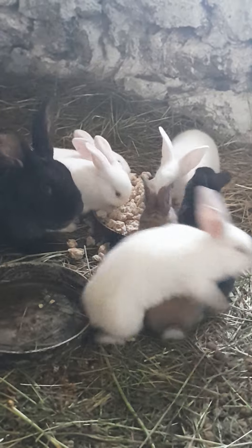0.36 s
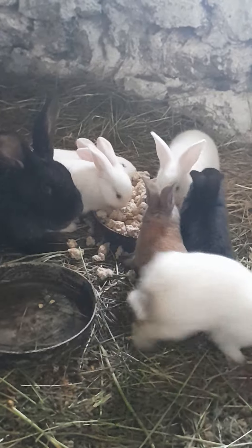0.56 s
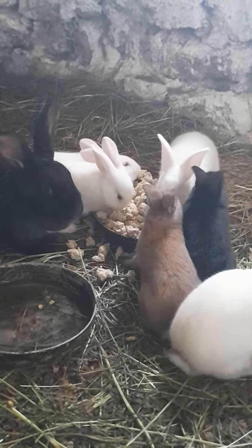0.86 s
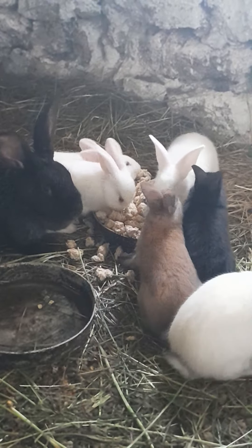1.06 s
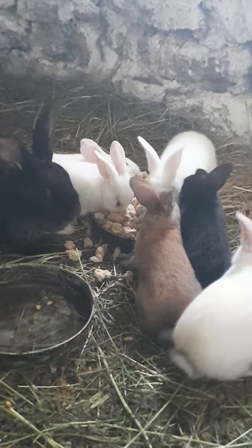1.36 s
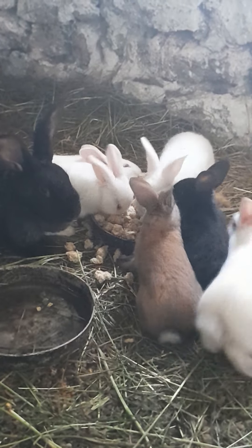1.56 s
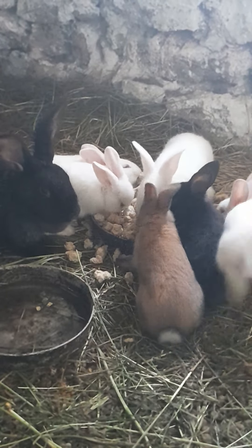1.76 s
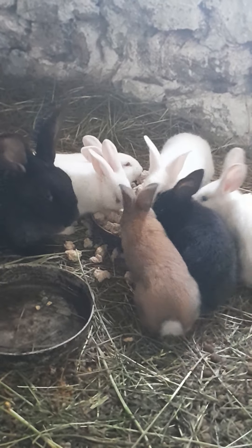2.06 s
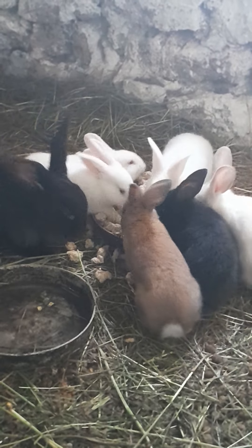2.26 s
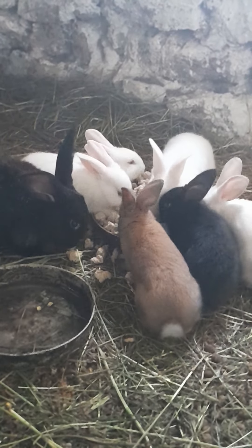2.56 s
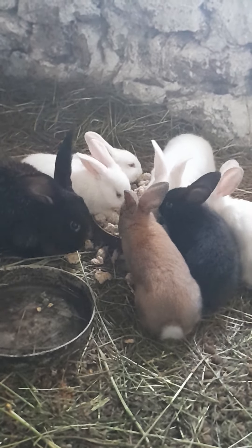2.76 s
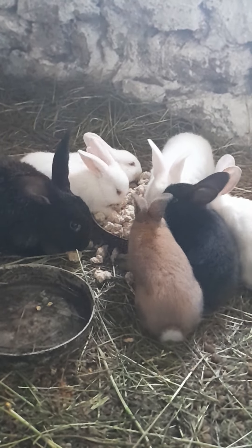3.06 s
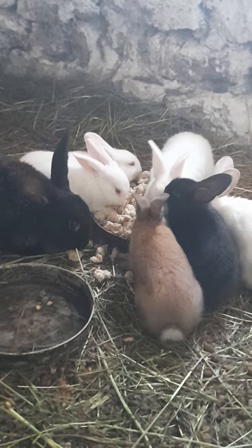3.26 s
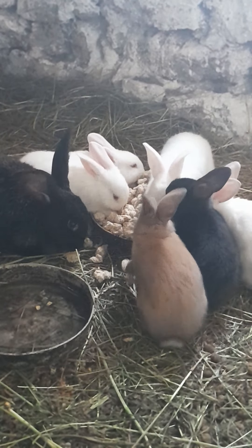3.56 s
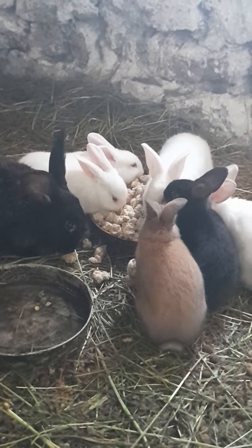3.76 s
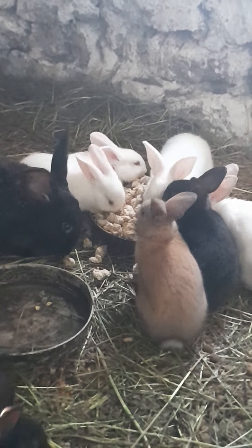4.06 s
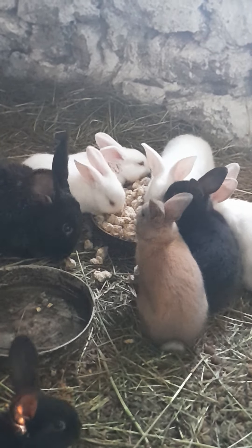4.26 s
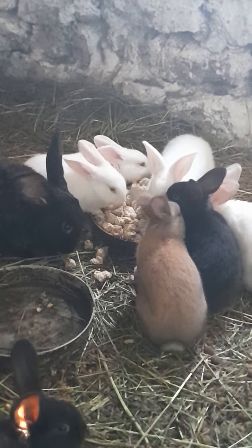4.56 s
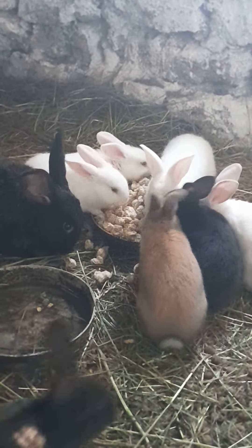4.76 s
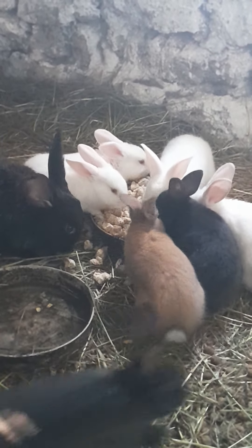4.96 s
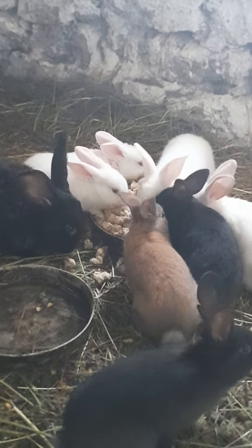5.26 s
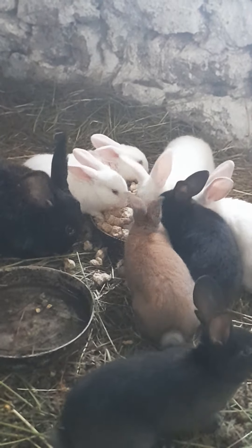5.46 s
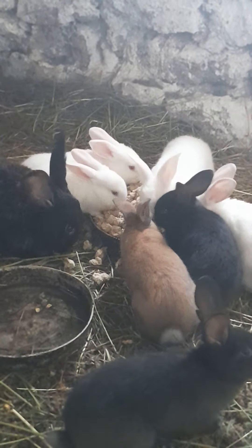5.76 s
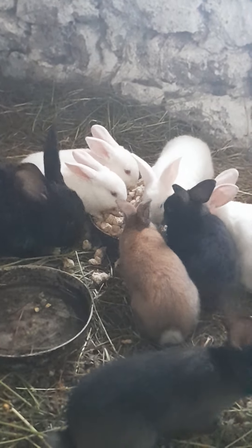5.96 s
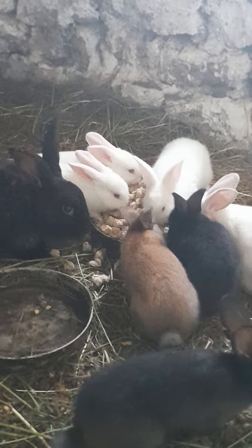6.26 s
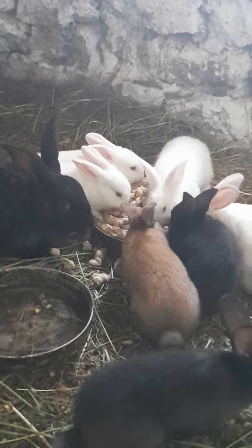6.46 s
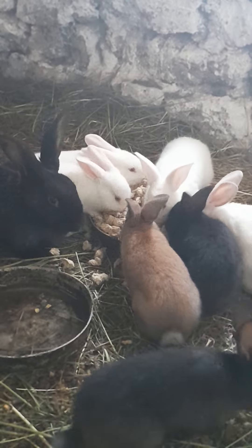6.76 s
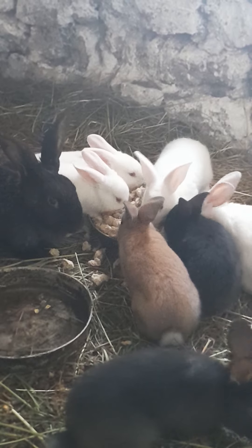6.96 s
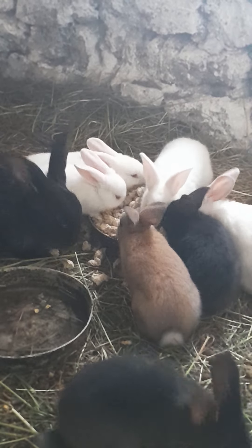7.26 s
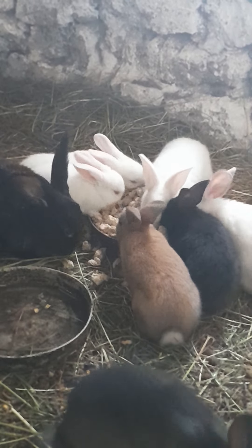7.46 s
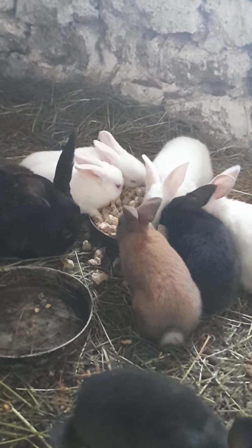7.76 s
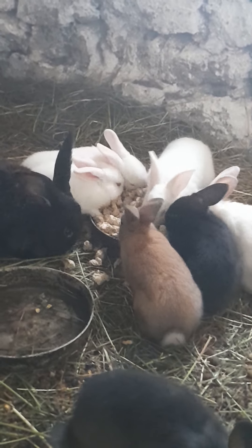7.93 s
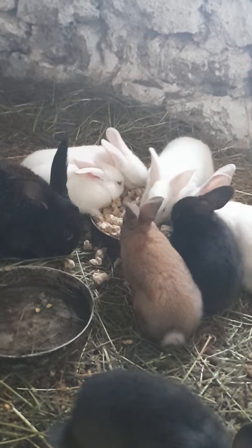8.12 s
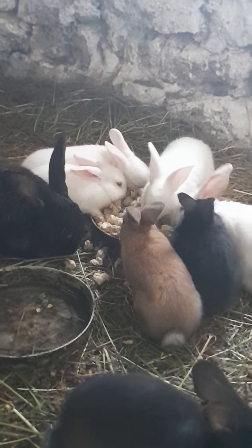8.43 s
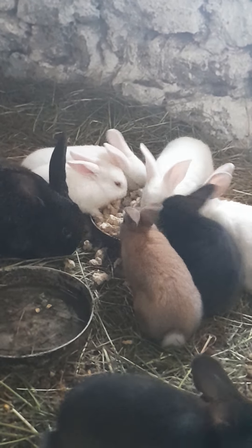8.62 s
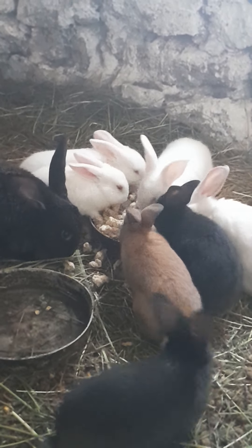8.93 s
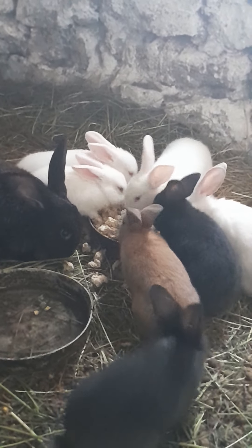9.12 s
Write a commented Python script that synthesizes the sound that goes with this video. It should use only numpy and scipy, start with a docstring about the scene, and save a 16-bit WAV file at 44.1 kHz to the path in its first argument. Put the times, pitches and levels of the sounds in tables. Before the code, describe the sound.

Close stereo microphones in a small stone-walled pen: rabbits snap and crumble dry feed and stir straw over a low, throbbing engine outside. A rooster beyond the doorway crows once, starting with rough, broken squawks and then holding a long clean note that falls. A hard clatter at the feed follows, then far-off roosters answer, small birds twitter, something flutters harshly, and nibbling continues.

```python
"""An engine rumbles behind stone walls while young rabbits crunch dry feed and shuffle on straw in a pen.
A rooster outside crows once, rough at first, then on a long clean note; far-off fowl answer, birds twitter,
and about 6.5 s something flutters harshly. The engine, a sum of orders of one cycle, slowly gathers speed.
The voices are sines with moving pitch; feed, straw, litter and soft low swells are noise or trains of
random cracks, filtered to their colours. Random tails give the pen and the doorway their reverberation."""
import sys
import numpy as np
from scipy import signal
from scipy.fft import rfft, irfft, next_fast_len
from scipy.io import wavfile

SR = 44100
rng = np.random.default_rng(int(sys.argv[2]) if len(sys.argv) > 2 else 0)


def wav_out(sig):
    """Save sig, one row per channel (or a flat mono array), as 16-bit PCM at SR to the path in sys.argv[1]."""
    wavfile.write(sys.argv[1], SR, np.round(np.clip(np.atleast_2d(sig).T, -1, 1) * 32767).astype(np.int16))


N = 409688
TIME = np.arange(N) / SR

# Spectrum of still air. Each row: frequency in Hz, relative density in dB per Hz.
AIR_COLOUR = [(130, -31), (220, -1), (326, -5), (427, -14), (681, -19), (4560, -27), (6410, -26),
              (7530, -29), (10400, -31), (15200, -26), (16000, -32)]
AIR_DB = -70
# Left-right likeness of diffuse sound. Each row: frequency in Hz, correlation from 0 to 1.
LIKENESS = [(25, 0.086), (45, 1), (80, 1), (150, 0.42), (300, 0.39), (700, 0.38), (2000, 0.026),
            (14000, 0.017)]
# Treble difference of the two microphones. Each row: frequency in Hz, left-right level in dB.
MIC_BALANCE = [(200, 1.5), (600, -0.5), (2000, 1), (5500, -2.5), (7000, -0.5), (8800, 10.5), (10500, 1),
               (12500, 0), (16000, -2.5)]
PEN_T60_S, CUTOFF_HZ = 0.19, 16200

# Engine speed. Each row: time in seconds, working cycles per second.
ENGINE_SPEED = [(0, 11.05), (.3, 11.28), (1.5, 11.3), (2, 11.72), (3.1, 11.76), (4.2, 12.6), (4.8, 12.2),
                (5.2, 12.95), (5.85, 13.3), (6.7, 13.3), (7.1, 13.52), (9.29, 14.12)]
# Firing tone, the eighth order. Each row: time in seconds, level in dB before the dips.
FIRING = [(0, -46), (1.4, -45.5), (1.9, -48), (2.3, -46.5), (2.8, -51), (3.3, -48.5), (4.3, -51.5),
          (5.15, -50), (6.05, -55), (6.4, -51), (7.9, -50.5), (9.29, -56)]
# Passage of orders 5, 7 and 10 through the walls. Each row: frequency in Hz, level in dB before waver and dips.
WALLS = [(55, -79), (59, -69), (61, -58.5), (66, -57), (70, -49), (79, -53.5), (82, -59), (90, -76),
         (100, -70), (112, -56), (118, -72), (130, -69), (134, -64.5), (140, -54.5)]
# Yard resonances that shape the weaker orders. Each row: frequency in Hz, level in dB before waver and dips.
YARD = [(33, -85), (45, -74.5), (68, -64.5), (80, -58.5), (100, -65.5), (124, -77), (143, -70.5),
        (165, -81.5), (181, -73.5), (195, -81.5), (218, -80.5), (245, -99.5), (300, -88), (350, -93)]
# Spectrum of the noisy part of the rumble. Each row: frequency in Hz, relative density in dB per Hz.
RUMBLE_COLOUR = [(22, -15.5), (40, -5), (65, -9), (95, 2.5), (130, -2.5), (200, -18), (320, -19.5),
                 (450, -34.5), (700, -42)]
# Brief changes of level. Each row: time in seconds, loss of the upper orders in dB, loss of the fifth in dB.
DIPS = [(.6, 5, -3), (1.77, 7, -2), (3.02, 8.5, -5), (4.33, 3.5, 8), (5.31, 9, 1), (5.67, 17.5, 13),
        (5.97, 3, 8), (7.07, 3, 4), (7.66, 1, 18), (8.25, 0, 29), (9.02, 9, 21)]
DIP_WIDTH_S = 0.067
FIRST_THROB_S = .06   # the strong orders come into step here, and once a cycle after
# Soft swells of low noise, some as the engine speeds up. Each row: start in seconds, length in seconds,
# level in dB.
LOW_SWELLS = [(3.33, 0.18, -66), (3.607, 0.091, -70), (4.383, .08, -62), (4.97, 0.24, -75),
              (7.232, .08, -72), (8.352, 0.23, -66), (8.665, 0.235, -69.5), (9.085, 0.18, -67)]
# Spectrum of the low swells. Each row: frequency in Hz, relative density in dB per Hz.
LOW_SWELL_COLOUR = [(170, -9), (250, 0), (340, 0), (450, -10)]

# Small birds, and about 6.5 s a harsh rustling flutter. Each row: start in seconds, length in seconds,
# start pitch in Hz, end pitch in Hz, relative level in dB, trill depth as a share of the pitch.
CHIRPS = [(5.094, 0.15, 3540, 3330, -89, 0.062), (5.485, 0.096, 2740, 2840, -94, 0.049),
          (5.746, 0.13, 4450, 4320, -89.5, 0.049), (5.726, 0.14, 6630, 6550, -88, 0.026),
          (5.787, 0.091, 3800, 3600, -86.5, 0.04), (5.927, 0.072, 4070, 3830, -88, 0.044),
          (6.155, 0.13, 3740, 3410, -84, 0.062), (6.35, 0.24, 3430, 3650, -82.5, 0.028),
          (6.494, 0.056, 3100, 2796, -78, 0.175), (6.516, 0.12, 4880, 4410, -78, 0.106),
          (6.569, 0.023, 4100, 3890, -74, 0.045), (6.775, 0.25, 4700, 4120, -86.5, 0.05),
          (6.786, 0.11, 6840, 6600, -87, 0.047), (6.994, 0.062, 4100, 3570, -82, 0.039),
          (7.154, 0.037, 4060, 3840, -85, 0.023), (7.421, 0.16, 4500, 4680, -86.5, 0.083),
          (8.354, .15, 4820, 4390, -77, 0.084), (8.678, 0.13, 2395, 2090, -87, 0.048),
          (8.702, 0.1, 4800, 4300, -84.5, 0.072), (8.68, 0.13, 6660, 6670, -87, 0.026),
          (8.98, 0.054, 2814, 2810, -83.5, 0.091), (9.203, 0.09, 2240, 2400, -86.5, 0.061)]
# A far rooster's wavering held note. Each row: time in seconds, pitch in Hz, level in dB before flicker.
FAR_HELD = [(4.1, 1010, -79), (4.19, 1032, -70), (4.29, 1048, -75), (4.39, 1004, -80.5),
            (4.51, 1029, -76.5), (4.6, 1041, -66.5), (4.71, 1013, -78), (4.8, 1038, -73.5),
            (4.87, 1087, -72), (4.94, 940, -83)]
# Another climbs in swells until its voice breaks up and down. Each row: time in seconds, pitch in Hz,
# level in dB before flicker.
FAR_BROKEN = [(5.48, 920, -96), (5.621, 1026, -83), (5.74, 1050, -84), (5.81, 1095, -67), (5.87, 1132, -82),
              (5.99, 1143, -72.5), (6.03, 1130, -84), (6.09, 1100, -68), (6.16, 1072, -62),
              (6.195, 1078, -79), (6.215, 1190, -74), (6.265, 1138, -61), (6.305, 1070, -66.5),
              (6.33, 1195, -69), (6.375, 1124, -66), (6.41, 1110, -94)]

# Opening notes of the crow. Each row: start in seconds, length in seconds, pitch in Hz,
# fundamental in dB, octave in relative dB, third harmonic in relative dB.
SHORT_NOTES = [(1.622, 0.11, 535, -61, -77, -72.5), (1.684, 0.1, 590.2, -58, -80, -80),
               (1.752, 0.097, 556, -60.5, -66, -78), (1.883, 0.11, 560, -62, -77, -71.5),
               (2.006, 0.25, 568, -71, -69.5, -67)]
NOTE_ATTACK_S, NOTE_RELEASE_S = 0.0202, 0.03
NOTE_SAG, SQUAWK_SAG = .03, 0.037   # a note's ends lie lower by this share of its pitch
# The long note, which holds and finally falls. Each row: time in seconds, pitch in Hz.
CROW_PITCH = [(2.24, 577), (2.4, 578), (2.49, 588), (2.61, 563), (2.8, 577), (3.03, 583), (3.33, 595),
              (3.53, 586), (3.77, 546), (3.86, 524), (4.02, 507), (4.16, 458)]
# Fundamental of the long note. Each row: time in seconds, level in dB.
FUNDAMENTAL = [(2.24, -57), (2.43, -55), (2.52, -56), (2.75, -55.5), (3.0, -58), (3.12, -44.5), (3.24, -41),
               (3.42, -44), (3.572, -51.5), (3.73, -49), (3.95, -52), (4.05, -52.5), (4.159, -92)]
# Octave of the long note. Each row: time in seconds, relative level in dB.
OCTAVE = [(2.24, -74), (2.33, -66.5), (2.42, -65.5), (2.49, -55), (2.57, -71.5), (2.72, -70), (2.84, -77),
          (3.0, -65.5), (3.47, -65), (3.6, -79), (3.7, -80), (3.77, -68.5), (3.98, -76), (4.05, -70),
          (4.16, -73)]
# Third harmonic of the long note. Each row: time in seconds, relative level in dB.
THIRD = [(2.24, -64), (2.33, -63.5), (2.52, -72.5), (2.59, -63), (2.66, -62.5), (2.71, -79), (2.77, -64.5),
         (2.88, -69), (3.03, -87), (3.13, -68), (3.42, -71.5), (3.52, -81), (3.66, -66.5), (3.79, -75),
         (3.9, -64), (4.03, -54), (4.16, -74)]
# Reflections move the fundamental between the ears. Each row: time in seconds,
# phase lead at the left in radians, left-right level in dB.
FUNDAMENTAL_STEREO = [(2.05, 2, 4), (2.28, 2.5, 4), (2.44, 2.5, 6), (2.52, 1, 7), (2.6, 3, 0.5),
                      (2.92, 4, 1), (3.12, 0.84, 7), (3.35, 1, 9), (3.48, 0.5, 1), (3.59, -2.5, 1.5),
                      (3.73, -2.5, -0.5), (3.83, -1.5, 5), (4.1, 1, 0)]
# Hoarseness of the crow. Each row: time in seconds, pitch flutter as a share of the pitch.
HOARSE = [(2.2, .014), (2.32, .007), (2.55, .004), (3.0, .0025), (3.1, .0008), (3.52, .0008), (3.65, .008),
          (3.85, .004)]
# Harmonics above the third. Each row: time in seconds, relative level in dB.
BRIGHTNESS = [(1.62, -92), (1.74, -79), (1.9, -83), (2.3, -95), (2.8, -92), (3.15, -84.5), (3.5, -78),
              (3.65, -84), (3.83, -81.5), (4.15, -100)]
# Steady throat resonances above the third harmonic. Each row: frequency in Hz, relative level in dB.
THROAT = [(1900, -6), (2150, -2), (2330, -13), (2600, -17), (2900, -5), (3300, -29), (3510, -10), (3580, 7),
          (3750, 6), (3950, -5), (4150, 1), (4600, -7.5), (5250, 4.5), (5800, -25), (6400, -1), (6900, -19),
          (8000, -35)]
# A lower resonance that shifts and swells. Each row: time in seconds, centre in Hz, relative level in dB.
RING = [(1.62, 2750, -85), (1.7, 2670, -85), (1.8, 2770, -78), (2.04, 2800, -68.5), (2.25, 2900, -78),
        (2.36, 2800, -69), (2.5, 2820, -78), (2.6, 2800, -69.5), (2.72, 2800, -69), (2.8, 2700, -82),
        (2.86, 2330, -71), (2.97, 2394, -102), (3.2, 2617, -77), (3.55, 2250, -87), (3.76, 2393, -83),
        (3.85, 2546, -77), (4.1, 2506, -92)]
# A treble resonance moved by the opening beak. Each row: time in seconds, centre in Hz, relative level in dB.
BEAK = [(1.62, 6100, -88), (2.1, 5900, -88), (2.37, 5950, -80), (2.479, 6150, -75.5), (2.6, 6700, -80),
        (2.8, 6500, -92), (3.15, 6506, -85), (3.481, 6500, -82), (3.7, 6460, -79), (4.1, 5475, -80)]
RING_WIDTH_HZ, BEAK_WIDTH_HZ = 350, 310
# The other side of the syrinx. Each row: start in seconds, length in seconds, pitch in Hz, fundamental
# in relative dB, octave in relative dB, flutter as a share of the pitch, rasp in relative dB.
SQUAWKS = [(1.615, 0.062, 727, -83, -69, 0.025, -77), (1.654, 0.1, 628, -55, -83, 0.027, -61),
           (1.912, 0.12, 744.7, -57, -53, 0.012, -56), (2.008, 0.17, 685, -58, -77, 0.038, -69),
           (2.096, .1, 737.4, -53, -57, 0.02, -54), (2.182, 0.099, 681.6, -53, -69.5, 0.024, -49.5)]
# Overtones of the squawks. Each row: multiple of the pitch, level in dB relative to the octave.
SQUAWK_OVERTONES = [(3, -46), (4, -20), (5, -37), (7, -28.5), (8, -26.5)]
# Resonances of the rasp. Each row: frequency in Hz, relative density in dB per Hz.
RASP_COLOUR = [(400, -26), (560, -7), (650, 15.5), (760, -8), (950, -11.5), (1250, -12), (1500, -0.5),
               (1750, -27), (2100, -13), (2500, -45), (2900, -24), (3500, -37)]

# Spectrum of the scuff. Each row: frequency in Hz, relative density in dB per Hz.
SCUFF_COLOUR = [(350, -19), (600, -7.5), (950, -1), (1500, -11), (2400, -19), (4000, -58)]
SCUFF_AT_S, SCUFF_LENGTH_S, SCUFF_DB = 1.156, 0.38, -64   # one rabbit hops
# Hard paws drag through the litter. Each row: start in seconds, length in seconds, level in dB.
SCRAPES = [(6.195, 0.091, -69), (6.45, 0.1, -59), (6.744, 0.082, -63), (8.879, 0.071, -63.5)]
# Gritty spectrum of the scrapes. Each row: frequency in Hz, relative density in dB per Hz.
SCRAPE_COLOUR = [(500, 4), (1500, -7), (2800, -0.5), (4500, -2.5), (6500, -1.5), (8500, -0.5), (11000, -9),
                 (16000, -8)]
SCRAPE_ATTACK_S, SCRAPE_RELEASE_S = 0.012, 0.061
# Paws and muzzles stir the straw. Each row: start in seconds, length in seconds, relative level in dB.
SHUFFLES = [(0.73, 0.24, -69), (1.038, 0.11, -69), (1.166, 0.28, -63.5), (1.53, 0.35, -67.5),
            (3.32, 0.22, -59), (3.662, 0.32, -61), (3.955, 0.32, -62.5), (4.403, 0.25, -78),
            (4.963, 0.16, -67), (5.086, 0.13, -55), (5.863, 0.57, -69.5), (7.417, 0.11, -60.5),
            (7.571, 0.17, -58.5), (8.337, 0.24, -62.5), (8.566, 0.17, -65), (8.848, 0.16, -62),
            (9.086, 0.11, -75)]
# Spectrum of the straw. Each row: frequency in Hz, relative density in dB per Hz.
STRAW_COLOUR = [(1200, -8), (2500, -7), (4500, -3.5), (7000, -1.5), (10000, -5), (13500, -0.5),
                (16000, -4.5)]
SHUFFLE_ATTACK_S, SHUFFLE_RELEASE_S = 0.044, 0.099
STRAW_REST_DB = -96   # relative, as in the shuffles
# Paws and knocks on the feed dish. Each row: time in seconds, relative level in dB, decay in seconds.
THUDS = [(0.584, -71.5, 0.012), (1.02, -73, 0.02), (3.233, -53.5, 0.04), (4.234, -63, 0.012),
         (4.272, -65, 0.0096), (4.632, -62, 0.024), (6.471, -79, 0.031), (7.236, -73.5, 0.02),
         (7.612, -74, 0.08), (7.66, -67, 0.032), (7.735, -64, 0.011), (8.394, -76, 0.34),
         (8.477, -47, 0.0057), (8.526, -69.5, 0.042), (8.972, -75.5, 0.051), (9.086, -63.5, 0.024),
         (9.112, -68, 0.016), (9.171, -63.5, 0.0088)]
# Dull spectrum of the knocks. Each row: frequency in Hz, relative density in dB per Hz.
THUD_COLOUR = [(150, 14.5), (300, -5.5), (620, 12.5), (1050, 1.5), (1500, -2), (2300, -9), (3200, -29),
               (5000, -16)]
# Bites and snaps. Each row: time in seconds, snap in relative dB, crumble in relative dB,
# power share of the treble in dB, before limiting.
BITES = [(.077, -57, -67, -20), (.2205, -56, -75, -5), (0.264, -62, -63.5, -10), (0.292, -58, -63, -1),
         (0.523, -57, -72, -10), (.5612, -55, -72, 2), (.586, -37, -60.5, -5), (.7623, -60, -69.5, -8),
         (.85, -56, -61.5, -3.5), (1.023, -40, -61.5, -3.5), (1.047, -42, -60.5, -10),
         (1.0744, -48, -65.5, -2), (1.314, -49, -52, -7), (1.35, -45, -55.5, -2), (1.635, -48, -63.5, 0),
         (1.6447, -41, -74, 1), (1.785, -53, -59, -3), (1.848, -56, -63.5, -5), (1.891, -48, -58, -16),
         (1.9257, -46, -59, -4), (2.7384, -57, -73, -4), (2.92, -58, -63.5, -9), (3.2272, -35, -56, -9),
         (3.2346, -23, -47, -22), (3.26, -40, -68, -16), (3.271, -18, -59, -9), (3.272, -17.5, -49, -20),
         (3.2766, -19, -61, -10), (3.301, -23, -57, -9), (3.3825, -45, -68, -8), (3.411, -42, -52, -13),
         (3.437, -41, -58, -20), (3.6008, -60, -65, -14), (3.7332, -58, -64.5, -9), (4.0005, -55, -60, -1),
         (4.049, -48, -62, -20), (4.236, -46, -65, -5), (4.2725, -43.5, -67, -4), (4.4456, -51, -73, 5),
         (4.468, -45, -75, 4), (4.4964, -45, -71, -7), (4.5227, -50, -70, -3), (4.5527, -57, -64, 1),
         (4.631, -40, -51.5, -12.5), (5.2013, -37.5, -60, -1.5), (5.382, -57, -70.5, -6),
         (5.633, -49, -69, -13), (5.98, -47, -65, -16), (6.091, -61, -77, -1), (7.208, -56, -66, -7),
         (7.2355, -40, -52.5, -3.5), (7.256, -42, -60.5, -22), (7.4316, -52, -71, -10),
         (7.471, -49, -63.5, -1), (7.626, -52, -53.5, -21), (7.667, -35, -54, -3), (7.687, -38, -63, -14),
         (7.7352, -33, -57, -3), (8.1773, -57, -62, -7), (8.2818, -43, -63.5, -14),
         (8.432, -41, -50.5, -15), (8.4756, -28, -58, -4), (8.601, -52, -69, -5), (8.627, -50, -66, -1),
         (8.6833, -49, -65, -5), (8.934, -44, -65.5, -2), (9.087, -54, -75, -3), (9.105, -40, -58.5, -2),
         (9.1452, -49, -60.5, -8), (9.171, -38, -62, -7)]
# Spectrum of the cracks. Each row: frequency in Hz, relative density in dB per Hz.
CRACK_COLOUR = [(880, -8.5), (1500, -3), (2610, -4.5), (2880, -8), (3590, -4.5), (3880, -1), (4590, -5),
                (5280, -2.5), (5710, -0.5), (8080, -1.5), (11900, -3), (13800, 3.5), (16000, -8.5)]
CRUMBLE_S, SNAP_S = 0.022, 0.00032   # e-folding times: crumble power over a quarter of this, snap amplitude


def from_db(db):
    """Logarithmic level: decibels to amplitude gain."""
    return 10 ** (np.asarray(db) / 20)


def rms_one(x):
    """Power normalisation: scale to unit mean square."""
    return x / np.sqrt(np.mean(x ** 2) + 1e-20)


def in_time(rows):
    """Linear interpolation: each column of a time table at every sample."""
    s, *columns = np.transpose(rows)
    return [np.interp(TIME, s, c) for c in columns]


def at_hz(points, hz):
    """Logarithmic pitch scale: read a spectrum on a log-frequency axis."""
    f, value = np.transpose(points)
    return np.interp(np.log(hz), np.log(f), value)


def during(rows):
    """Gating: a window over the span of a time table, with 20 ms ramps."""
    return np.clip(np.minimum(TIME - rows[0][0], rows[-1][0] - TIME) / .02, 0, 1)


def swell(s, length, attack_s, release_s):
    """Amplitude envelope: attack, hold and release of one sound."""
    return np.clip(np.minimum((TIME - s) / attack_s, (s + length - TIME) / release_s), 0, 1)


def arch(s, length, sag):
    """Parabolic glide: pitch factor that rises to the middle of a note and sinks again."""
    return 1 - sag * np.clip(2 * (TIME - s) / length - 1, -1, 1) ** 2


def drift(rate):
    """Random modulation: a wander of spread 1, joined linearly between 2 * rate random knots a second."""
    knots = rng.standard_normal(N // 8)
    return np.interp(TIME * rate * 2, np.arange(len(knots)), knots) * np.sqrt(3 / 2)


def phase_of(hz):
    """Frequency modulation: phase is the running integral of frequency."""
    return 2 * np.pi * np.cumsum(hz) / SR


def partial(phase, db):
    """Simple harmonic motion: a sine of the given rms level from a random starting phase."""
    return np.sqrt(2) * from_db(db) * np.sin(phase + rng.uniform(0, 2 * np.pi))


def resonance(hz, track, width_hz):
    """Resonance: gain of a partial near a centre that moves and swells."""
    centre, db = track
    return from_db(db) / (1 + ((hz - centre) / width_hz) ** 4)


def coloured(x, spectrum):
    """Minimum-phase filtering: a causal spectrum of unit mean power, built from its folded cepstrum."""
    size = next_fast_len(N + SR // 4) // 2 * 2
    half = size // 2
    hz = np.maximum(np.arange(half + 1) * SR / size, 1)
    octaves_below = np.maximum(np.log2(spectrum[0][0] / hz), 0)
    octaves_above = np.maximum(np.log2(hz / spectrum[-1][0]), 0)
    # beyond its ends the spectrum falls 24 dB an octave, for three octaves
    db = at_hz(spectrum, hz) - 24 * np.minimum(octaves_below + octaves_above, 3)
    cepstrum = irfft(np.log(rms_one(from_db(db))))
    cepstrum[1:half] *= 2
    cepstrum[half + 1:] = 0
    return irfft(rfft(x, size) * np.exp(rfft(cepstrum)))[..., :N]


def diffuse_noise():
    """Spatial coherence: white stereo noise, its sides alike as the likeness table sets per frequency."""
    size = next_fast_len(N, real=True)
    mid, side = rfft(rng.standard_normal((2, size)))
    hz = np.maximum(np.arange(len(mid)) * SR / size, 1)
    alike = np.clip(at_hz(LIKENESS, hz), 0, 1)
    stereo = np.sqrt(1 + alike) * mid + np.sqrt(1 - alike) * side * [[1], [-1]]
    return rms_one(irfft(stereo, size)[:, :N])


def fractures(per_s, spread_db):
    """Shot noise: tiny cracks of uneven size at random moments, reaching the two sides differently."""
    happens = rng.random(N) < per_s / SR
    sizes = from_db(spread_db * np.minimum(rng.exponential(1, N), 4)) * happens
    return rms_one(sizes * diffuse_noise())


def pen(x, wet_db, t60=PEN_T60_S):
    """Reverberation: direct sound plus a dense decaying tail, different at each ear; power is kept."""
    t = TIME[:SR]
    tail = rng.standard_normal((2, SR)) * from_db(-60 * t / t60) * (t > .003)
    tail /= np.sqrt(np.sum(tail ** 2, axis=1, keepdims=True))
    x, wet = x * np.ones((2, 1)), from_db(wet_db)
    return (x + wet * signal.fftconvolve(x, tail, axes=1)[:, :N]) / np.sqrt(1 + wet ** 2)


def through_doorway(x, sideways_db=-1.0, echo_s=0.0058):
    """Specular reflection: outside sound also glances off a side wall, with opposite sign at the two ears."""
    echo = np.interp(TIME - echo_s, TIME, x)
    return pen(x, wet_db=-8, t60=.35) + from_db(sideways_db) * echo * [[1], [-1]]


def still_air():
    """Broadband background: diffuse noise with the spectrum of still air."""
    return from_db(AIR_DB) * coloured(diffuse_noise(), AIR_COLOUR)


def low_swells(attack_s=0.018, release_s=.05):
    """Band-limited noise: soft swells mostly between 200 and 400 Hz, some as the engine speeds up."""
    level = sum(from_db(db) * swell(s, length, attack_s, release_s) for s, length, db in LOW_SWELLS)
    return level * coloured(diffuse_noise(), LOW_SWELL_COLOUR)


def engine(weak_waver_db=3.5, strong_waver_db=2.5, rumble_db=-64, dip_share=0.67, ninth_db=-19):
    """Beating: low orders pass the walls, and neighbouring ones beat into a throb at the cycle rate."""
    cycles, = in_time(ENGINE_SPEED)
    firing_db, = in_time(FIRING)
    phase = phase_of(cycles)
    phase -= np.interp(FIRST_THROB_S, TIME, phase)
    upper_loss, fifth_loss = 0, 0
    for s, upper, fifth in DIPS:
        dip = np.exp(-((TIME - s) / DIP_WIDTH_S) ** 2)
        upper_loss = upper_loss + upper * dip
        fifth_loss = fifth_loss + fifth * dip
    firing = np.cos(8 * phase) + from_db(ninth_db) * np.cos(9 * phase)
    strong = from_db(firing_db - upper_loss) * firing
    for k, loss in ((5, fifth_loss), (7, upper_loss), (10, upper_loss)):
        db = at_hz(WALLS, k * cycles) - loss + strong_waver_db * drift(2.5)
        strong += from_db(db) * np.cos(k * phase)
    weak_orders = [k for k in range(3, 28) if k not in (5, 7, 8, 9, 10)]
    weak = sum(partial(k * phase, at_hz(YARD, k * cycles) + weak_waver_db * drift(3)) for k in weak_orders)
    rumble = from_db(rumble_db) * coloured(diffuse_noise(), RUMBLE_COLOUR)
    return np.sqrt(2) * strong + from_db(-dip_share * upper_loss) * (weak + rumble)


def chirps_and_flutter():
    """Frequency modulation: a fast, uneven trill makes gliding bird chirps buzzy, and one flutter harsh."""
    out, trill = np.zeros(N), drift(520)
    for s, length, start_hz, end_hz, db, depth in CHIRPS:
        on = (TIME >= s) & (TIME < s + length)
        along = (TIME[on] - s) / length
        glide = start_hz + (end_hz - start_hz) * along
        tone = partial(phase_of(glide * (1 + depth * trill[on])), db)
        out[on] += tone * np.sqrt(np.sin(np.pi * along))
    return out


def far_fowl(flutter=0.019, flutter_hz=70, flicker_db=2.5):
    """Loss with distance: a single wavering, flickering partial is left of each call."""
    out, waver, flicker = np.zeros(N), 1 + flutter * drift(flutter_hz), flicker_db * drift(14)
    for call in (FAR_HELD, FAR_BROKEN):
        hz, db = in_time(call)
        out += partial(phase_of(hz * waver), db + flicker) * during(call)
    return out


def crow_controls():
    """Voice source: pitch, levels of three harmonics and gate, for the short notes and then the long one."""
    curves = (CROW_PITCH, FUNDAMENTAL, OCTAVE, THIRD)
    controls = np.array([in_time(curve)[0] for curve in curves])
    gate = during(CROW_PITCH)
    for s, length, hz, *levels in SHORT_NOTES:
        note = swell(s, length, NOTE_ATTACK_S, NOTE_RELEASE_S)
        on = note > gate
        controls[0, on] = hz * arch(s, length, NOTE_SAG)[on]
        controls[1:, on] = np.array(levels)[:, None]
        gate = np.maximum(gate, note)
    return *controls, gate


def rasp():
    """Pulsed turbulence: in each squawk, air bursts once a cycle of the main voice and rings in the throat."""
    hz = crow_controls()[0]
    level = sum(from_db(db) * swell(s, length, NOTE_ATTACK_S, NOTE_RELEASE_S)
                for s, length, *_, db in SQUAWKS)
    bursts = rms_one(rng.standard_normal(N) * (1 + np.cos(phase_of(hz))))
    return coloured(bursts * level, RASP_COLOUR)


def squawk(shimmer=9.0, flutter_hz=120):
    """Two sources in one syrinx: a second, unsteady voice clashes with the first in the opening syllables."""
    out, jitter, tremble = np.zeros(N), drift(flutter_hz), drift(150)
    for s, length, hz, first, octave, flutter, _ in SQUAWKS:
        gate = swell(s, length, NOTE_ATTACK_S, NOTE_RELEASE_S)
        on = gate > 0
        pitch = hz * arch(s, length, SQUAWK_SAG) * (1 + flutter * jitter)
        phase = phase_of(pitch[on])
        voice = partial(phase, first) + partial(2 * phase, octave)
        voice += sum(partial(k * phase, octave + db) for k, db in SQUAWK_OVERTONES)
        out[on] += voice * (1 + shimmer * flutter * tremble[on]) * gate[on]
    return out


def crow(shimmer=49.0, flutter_hz=150, overtone_waver_db=3.5, low_waver_db=2.8, overtones_db=-1.5):
    """Source and filter: harmonics through moving resonances, fluttering in pitch and strength when hoarse."""
    hz, first, second, third, gate = crow_controls()
    on = gate > 0
    curves = in_time(HOARSE) + in_time(BRIGHTNESS) + in_time(FUNDAMENTAL_STEREO)
    hoarse, bright_db, lead, pan_db = (c[on] for c in curves)
    ring, beak = (np.array(in_time(track))[:, on] for track in (RING, BEAK))
    hz = hz[on]
    phase = phase_of(hz * (1 + hoarse * drift(flutter_hz)[on]))
    overtones, fundamental = np.zeros(N), np.zeros((2, N))
    for k, db in ((2, second), (3, third)):
        overtones[on] += partial(k * phase, db[on] + low_waver_db * drift(13)[on])
    for k in range(4, 14):
        gain = from_db(bright_db + at_hz(THROAT, k * hz))
        gain += resonance(k * hz, ring, RING_WIDTH_HZ) + resonance(k * hz, beak, BEAK_WIDTH_HZ)
        overtones[on] += gain * partial(k * phase, overtone_waver_db * drift(7)[on] - 3.0)
    for ear, sign in enumerate((1, -1)):
        ear_gain = 2 * from_db(first[on]) / np.sqrt(1 + from_db(-sign * pan_db) ** 2)
        fundamental[ear, on] = np.sin(phase + sign * lead / 2) * ear_gain
    strength = gate.copy()
    strength[on] *= 1 + shimmer * hoarse * drift(160)[on]
    outside = through_doorway(from_db(overtones_db) * overtones * strength)
    return pen(fundamental * strength, wet_db=-6.5, t60=0.52) + outside


def scuff(attack_s=0.1, release_s=0.2, clump_db=-2.0):
    """Friction: fur and feet brush over the packed bedding in uneven touches."""
    level = from_db(SCUFF_DB) * swell(SCUFF_AT_S, SCUFF_LENGTH_S, attack_s, release_s)
    clumps = from_db(clump_db * np.tanh(drift(25.04)))
    touches = rms_one(fractures(per_s=300, spread_db=4.5) * clumps)
    return level * coloured(touches, SCUFF_COLOUR)


def scrapes(clump_db=2.0):
    """Granular slip: grit and chaff give way in a short, uneven run of tiny cracks."""
    level = sum(from_db(db) * swell(s, length, SCRAPE_ATTACK_S, SCRAPE_RELEASE_S) for s, length, db in SCRAPES)
    grit = fractures(per_s=1600, spread_db=6.5) * from_db(clump_db * drift(60))
    return level * coloured(rms_one(grit), SCRAPE_COLOUR)


def straw(rustle_db=-4.5, clump_db=5.5):
    """Crackling: dry stalks snap at random in soft clumps under paws and nibbling mouths."""
    level = from_db(STRAW_REST_DB) + sum(from_db(db) * swell(s, length, SHUFFLE_ATTACK_S, SHUFFLE_RELEASE_S)
                                         for s, length, db in SHUFFLES)
    clumps = from_db(clump_db * np.tanh(drift(14)))
    crackle = rms_one(fractures(per_s=450, spread_db=4.2) * clumps)
    return coloured(level * from_db(rustle_db) * crackle, STRAW_COLOUR)


def thuds(level_db=8.5):
    """Impact and decay: a paw or muzzle knocks the feed and the pellets settle with a dull rattle."""
    power = np.zeros(N)
    for s, db, decay in THUDS:
        at = round(s * SR)
        age = TIME[:min(N - at, SR // 2)]
        power[at:at + len(age)] += (from_db(db + level_db) * np.exp(-age / decay)) ** 2
    return coloured(np.sqrt(power) * fractures(per_s=4800, spread_db=1.5), THUD_COLOUR)


def bites(snap_db=-3.0, top_db=11.0, split_hz=9500, build_s=0.00047):
    """Brittle fracture: a pellet or stalk snaps, then crumbles in a dying run of cracks, dull or bright."""
    out, grains = np.zeros((2, N)), fractures(per_s=2300, spread_db=3.5)
    below, above = (signal.butter(2, split_hz, kind, fs=SR) for kind in ("low", "high"))
    for s, peak, level, top in BITES:
        at = round(s * SR)
        age = TIME[:min(N - at, SR // 3)]
        dying = np.exp(-2 * age / CRUMBLE_S) * (1 - np.exp(-age / build_s))
        crack = from_db(level) * dying * grains[:, at:at + len(age)]
        tear = rng.standard_normal(len(age)) * np.exp(-age / SNAP_S)
        crack += from_db(peak + snap_db) * tear / np.linalg.norm(tear)
        low, high = signal.lfilter(*below, crack), signal.lfilter(*above, crack)
        top_share = np.clip(from_db(top) ** 2, .02, .9)
        dull = low * np.sqrt(2 * (1 - top_share))
        bright = high * from_db(top_db) * np.sqrt(top_share)
        out[:, at:at + len(age)] += dull - bright
    return coloured(out, CRACK_COLOUR)


def scene():
    """Superposition: engine, low swells and air all round, birds outside, rabbits close by."""
    background = still_air() + low_swells() + engine()
    chirps = pen(from_db(9.5) * chirps_and_flutter(), wet_db=4.5, t60=0.38)
    distant = pen(far_fowl(), wet_db=5.0, t60=0.19) + chirps
    rooster = crow() + through_doorway(from_db(3.5) * squawk() + rasp())
    litter = pen(straw() + scuff() + scrapes(), wet_db=8.5)
    feeding = pen(bites() + thuds(), wet_db=-2.5)
    return background + distant + rooster + litter + feeding


def record(dry):
    """Transducer response: the microphones differ in spectral balance, and the top is cut steeply."""
    size = next_fast_len(N + SR // 4, real=True)
    hz = np.maximum(np.fft.rfftfreq(size, 1 / SR), 1)
    gains = from_db(at_hz(MIC_BALANCE, hz) * [[1], [-1]] / 2)
    gains /= np.sqrt(np.mean(gains ** 2, axis=0))
    heard = irfft(rfft(dry, size) * gains, size)[:, :N]
    return signal.sosfilt(signal.ellip(10, .1, 70, CUTOFF_HZ, fs=SR, output="sos"), heard)


dry = scene()
out = record(dry)
wav_out(out)
```